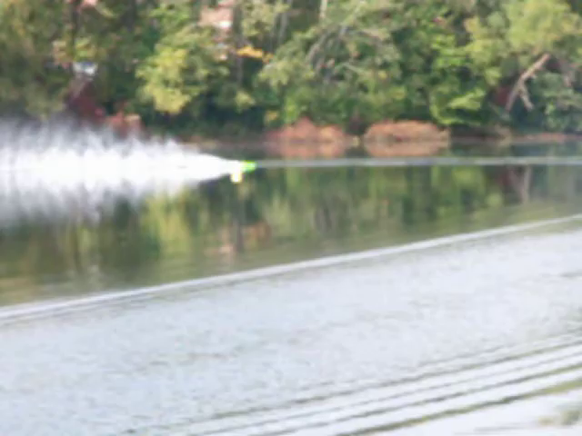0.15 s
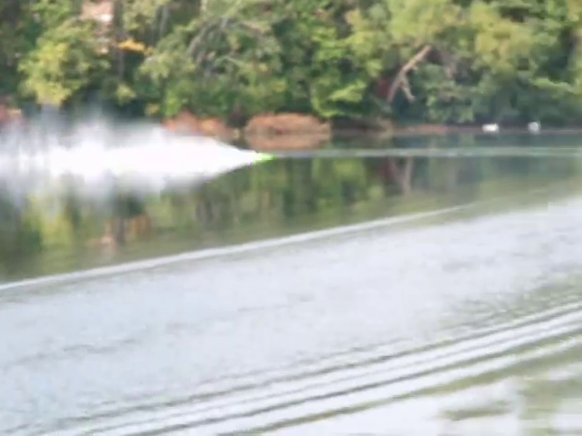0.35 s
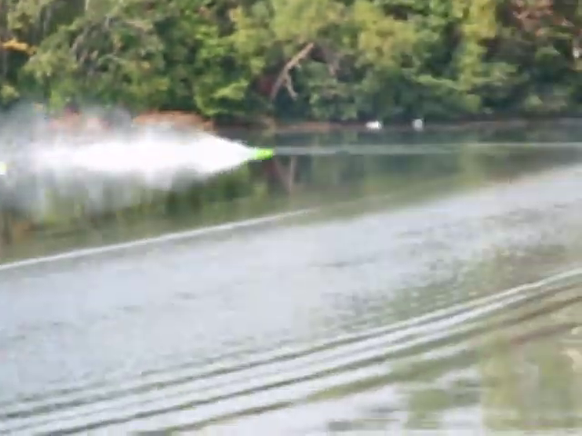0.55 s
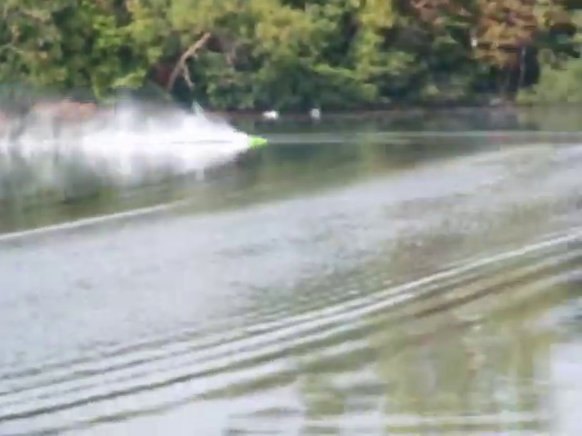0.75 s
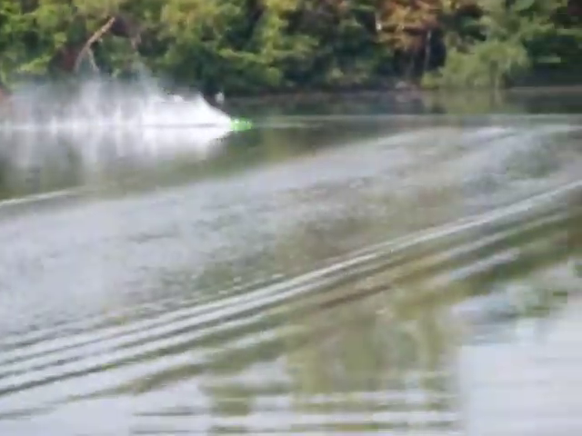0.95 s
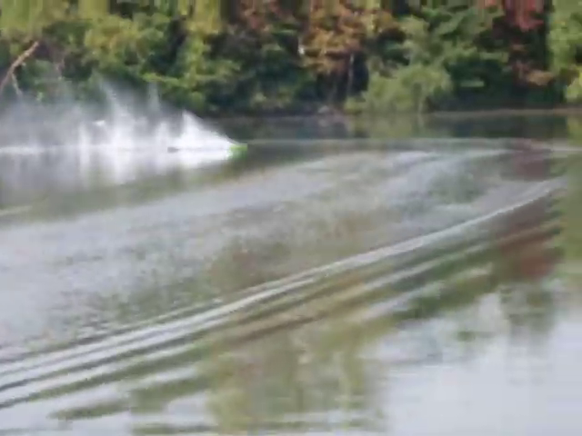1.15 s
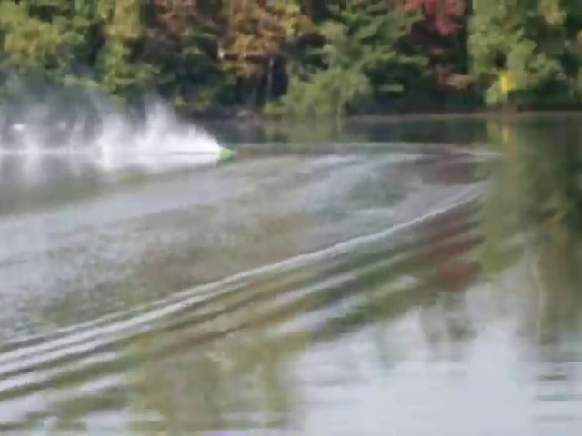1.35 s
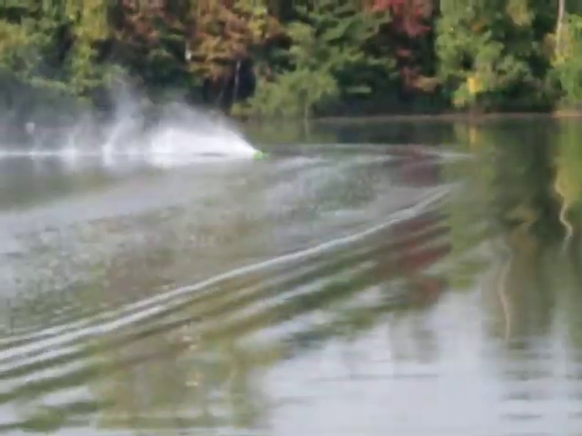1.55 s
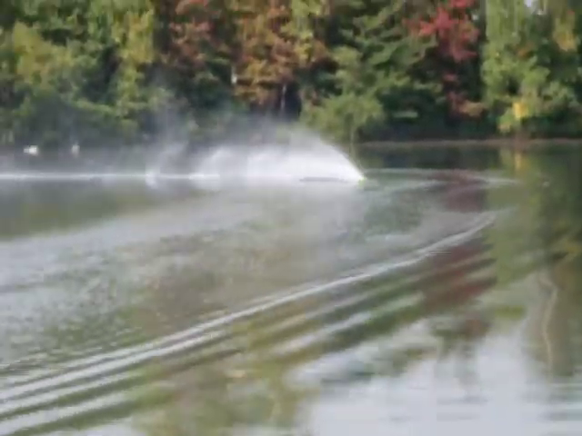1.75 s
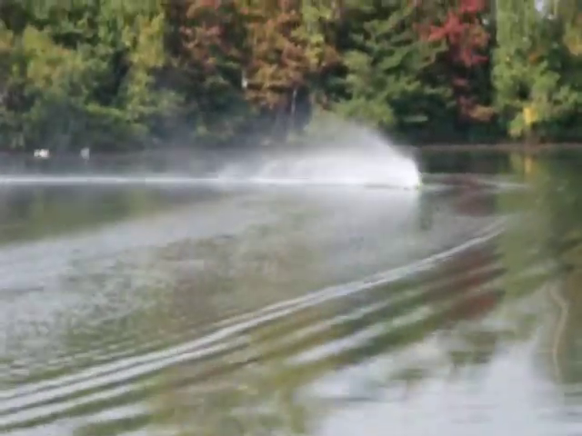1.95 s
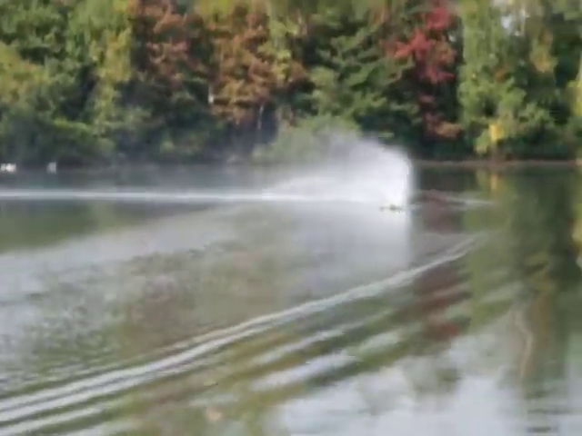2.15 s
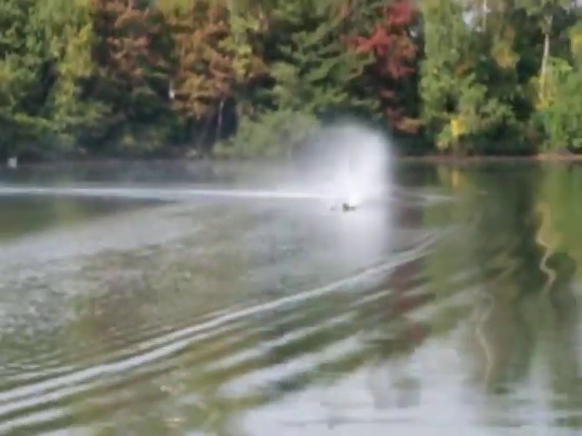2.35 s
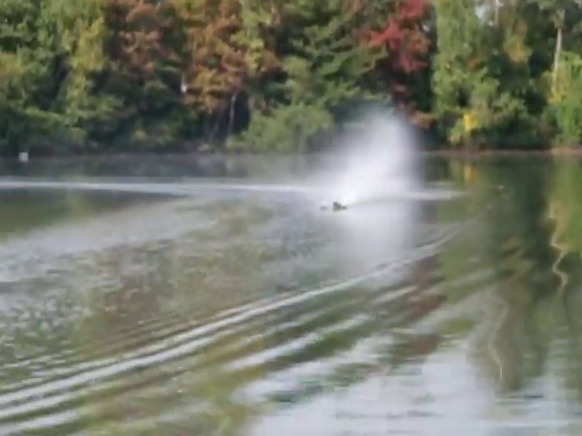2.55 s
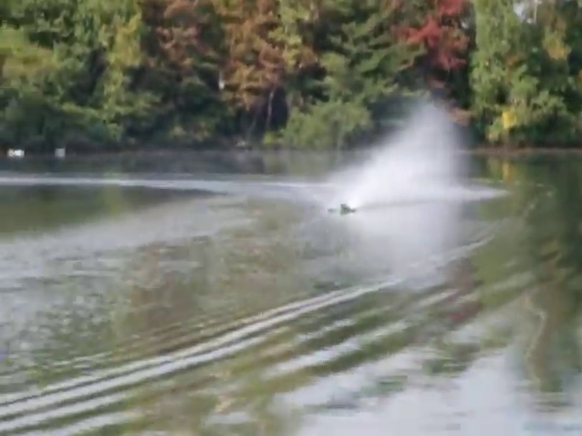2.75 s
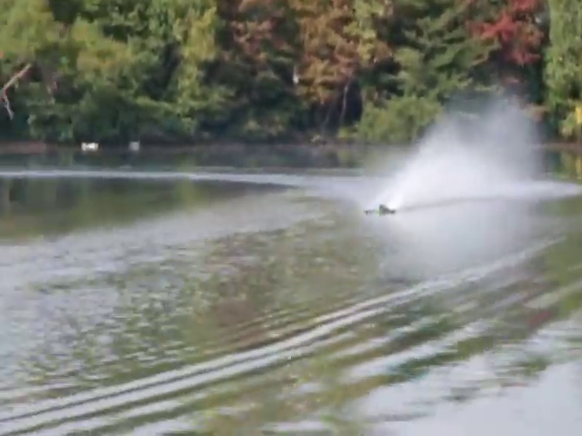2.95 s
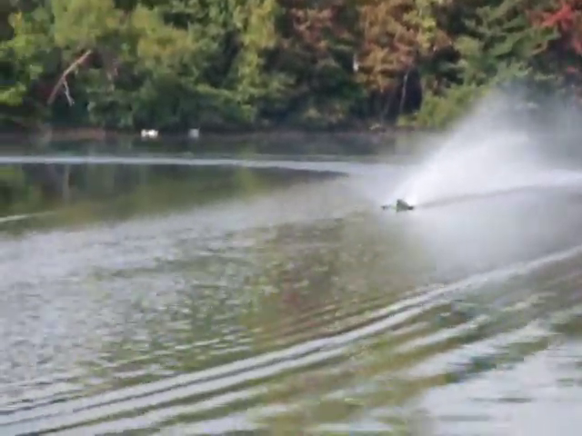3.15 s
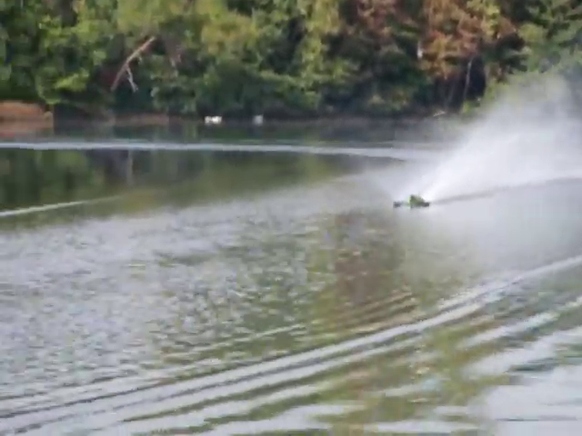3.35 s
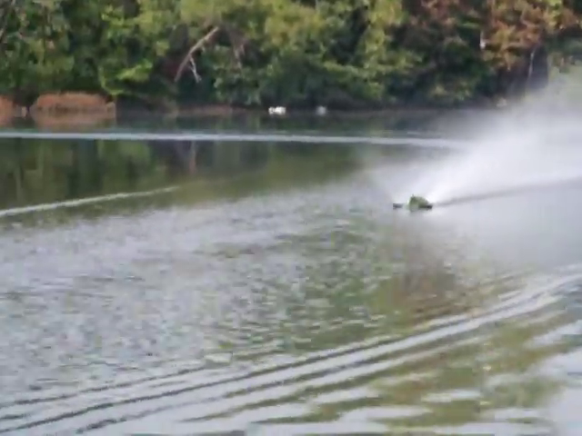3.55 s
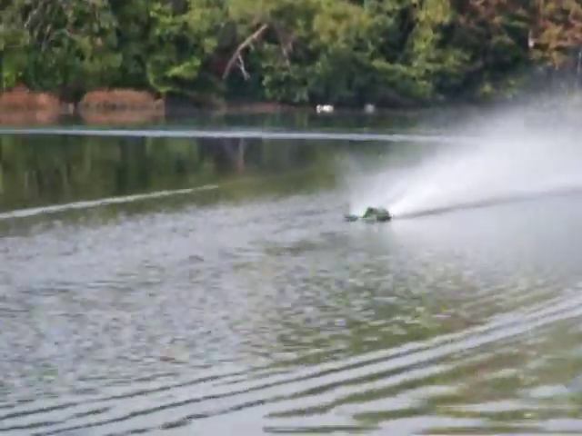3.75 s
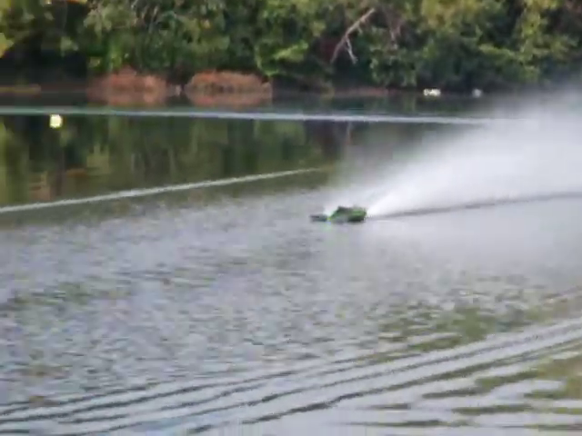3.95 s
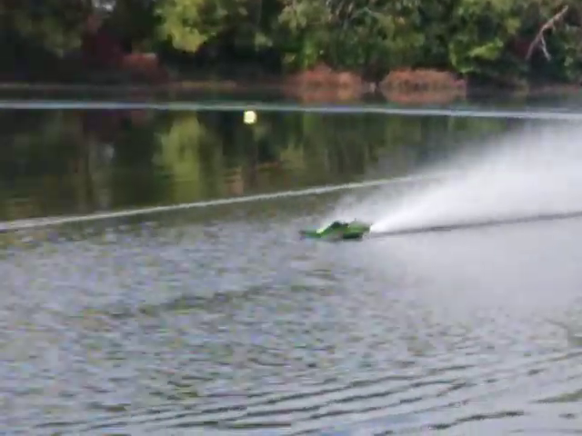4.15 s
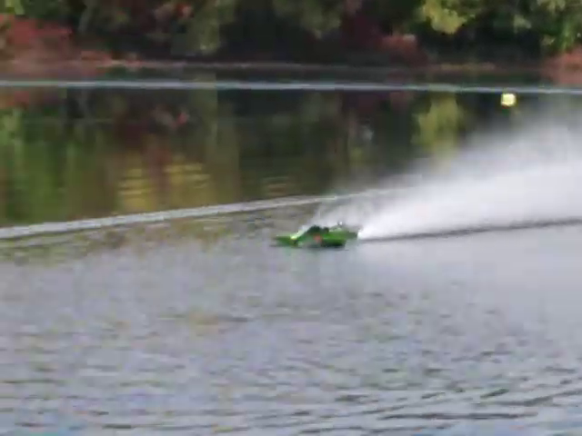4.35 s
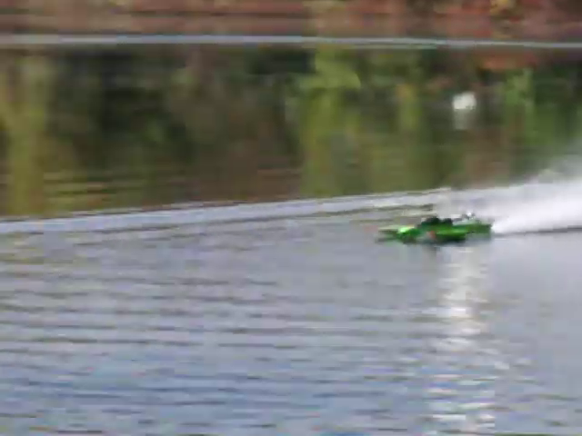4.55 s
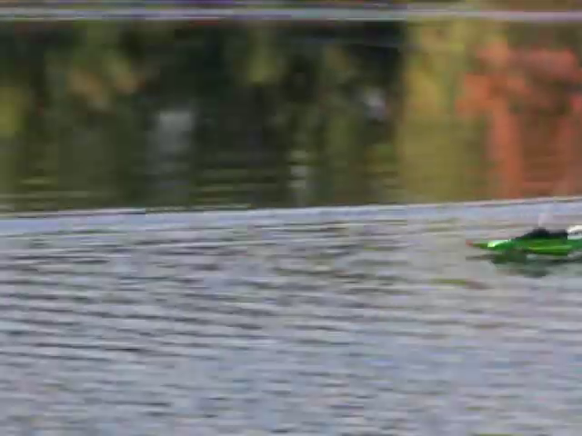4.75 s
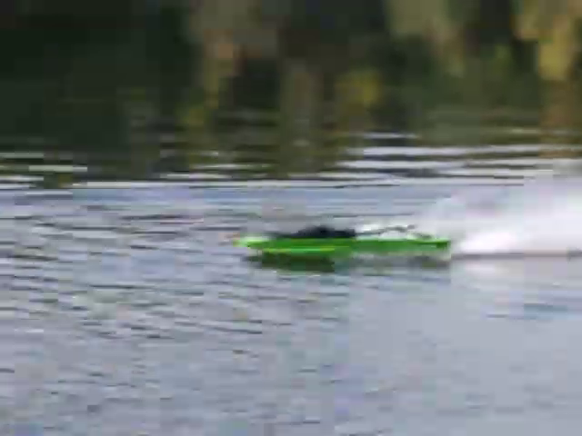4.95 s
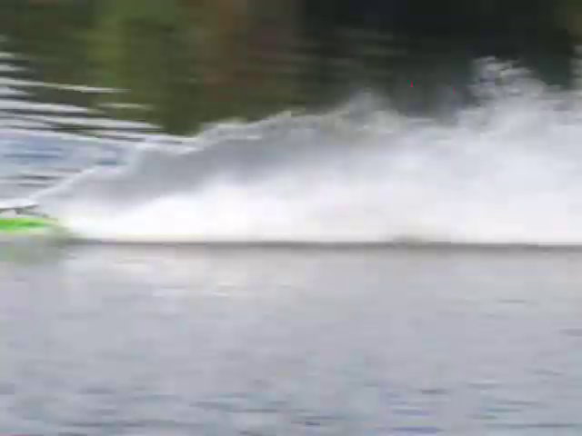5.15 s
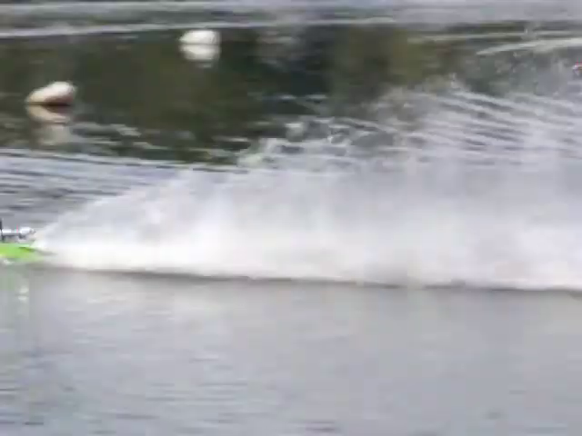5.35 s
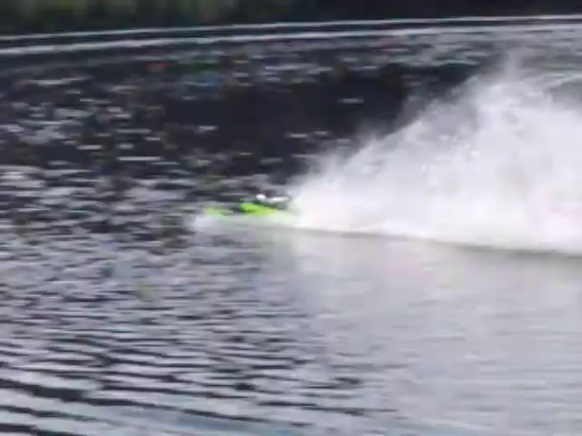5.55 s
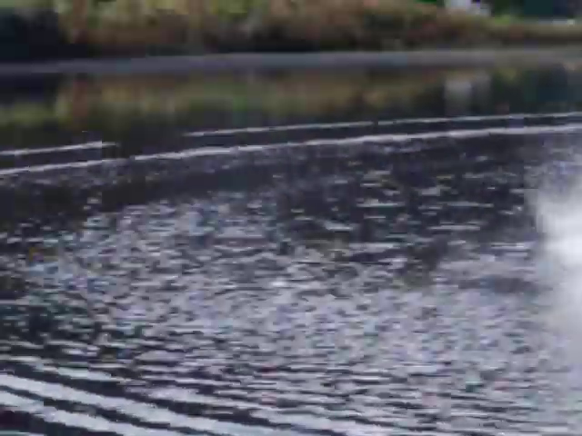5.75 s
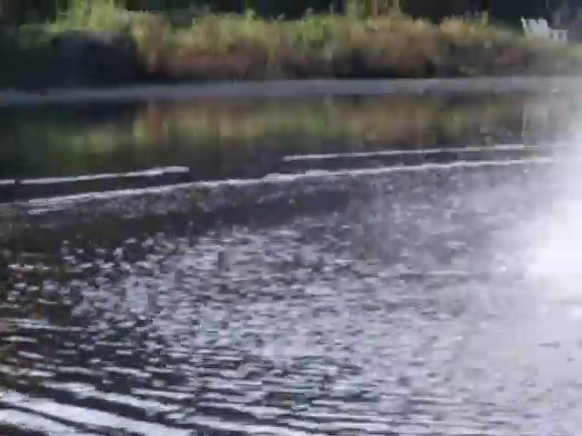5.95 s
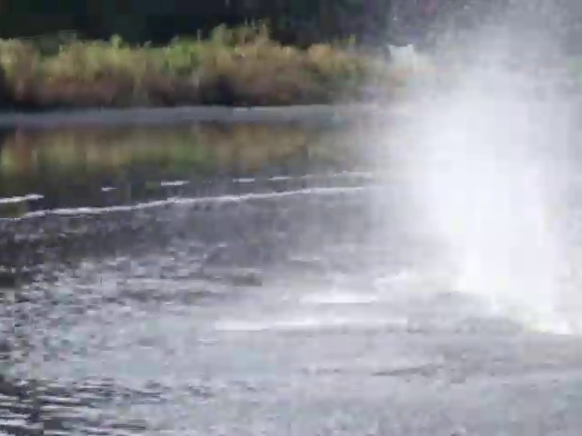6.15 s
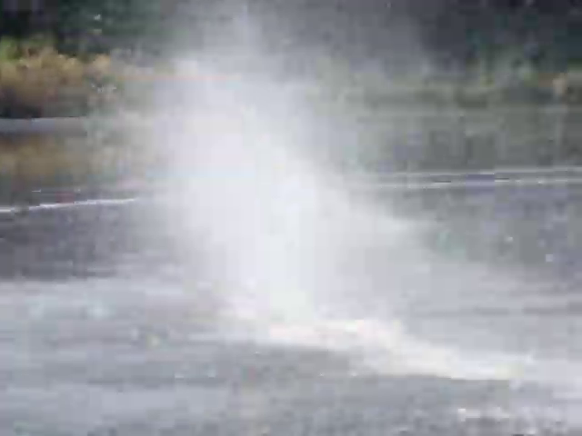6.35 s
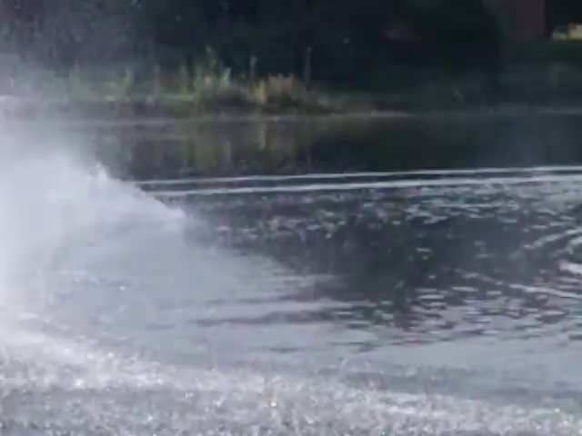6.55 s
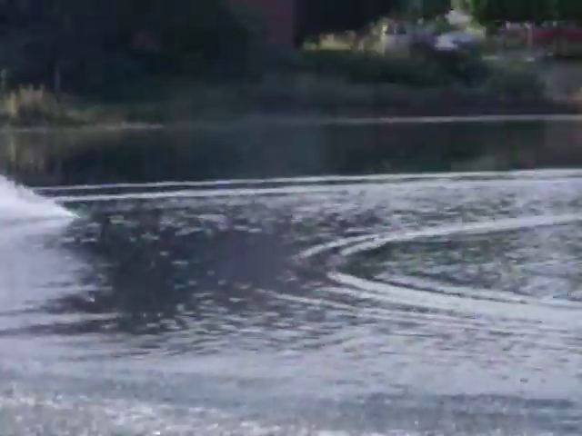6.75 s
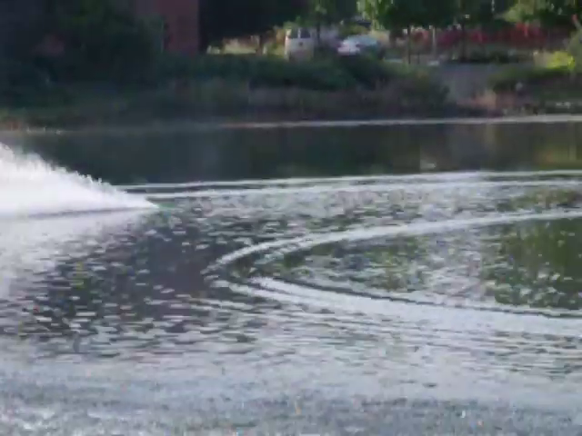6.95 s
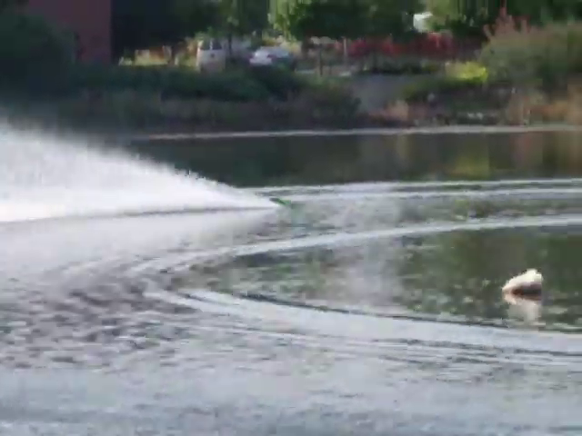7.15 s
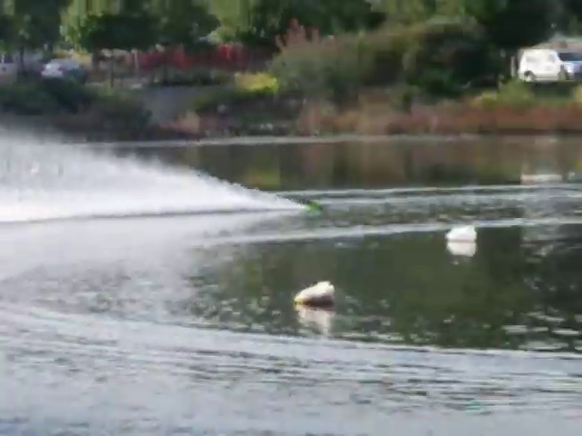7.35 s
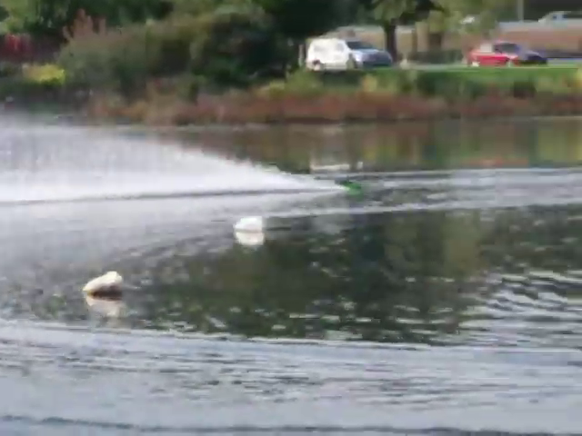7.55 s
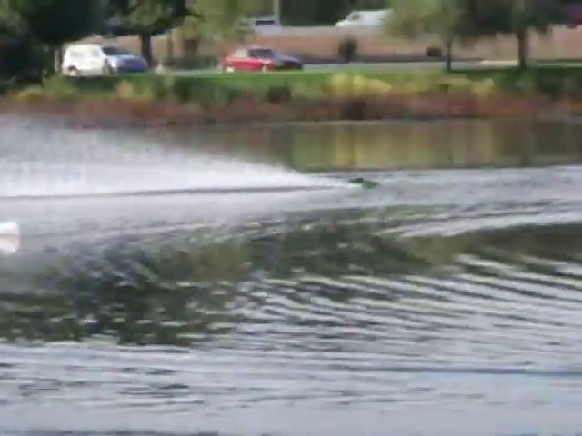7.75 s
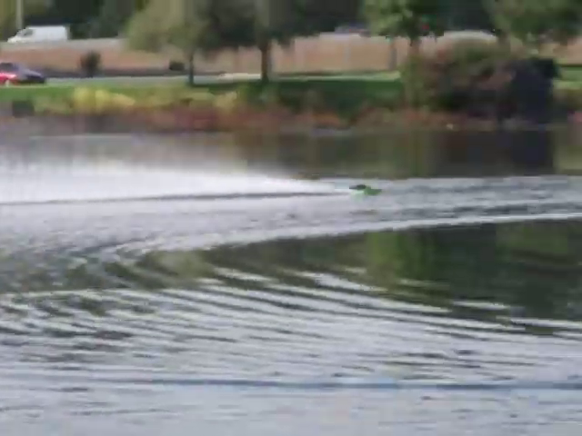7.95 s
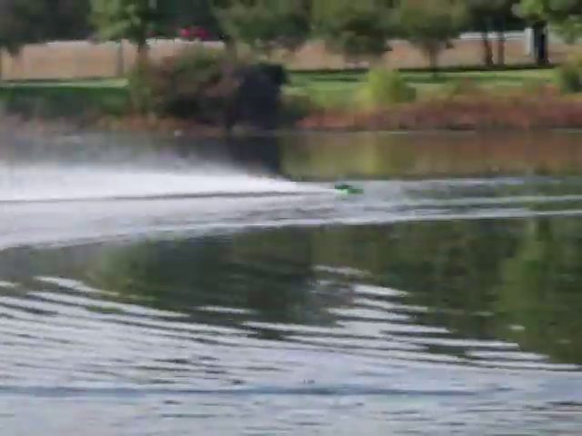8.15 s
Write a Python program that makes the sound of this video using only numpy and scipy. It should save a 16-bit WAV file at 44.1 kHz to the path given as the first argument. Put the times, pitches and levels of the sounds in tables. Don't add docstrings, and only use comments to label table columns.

```python
import sys
import numpy as np
from scipy import signal
from scipy.fft import rfft, irfft, next_fast_len
from scipy.io import wavfile
from scipy.ndimage import uniform_filter1d

SR = 44100
rng = np.random.default_rng(int(sys.argv[2]) if len(sys.argv) > 2 else 0)


def volts_from_decibels(level):
    exponent = np.asarray(level, float) / 20
    return 10 ** exponent


def int16_out(signal):
    q = np.round(np.clip(np.atleast_2d(signal).T, -1, 1) * 32767)
    wavfile.write(sys.argv[1], SR, q.astype(np.int16))


N = 361619

# t/s, nearness/dB, bearing off the bow/degrees,
# extra path off the water for the pipe/ms, for the hull/ms
LAP = [(0.0, -42, -104, 0.45, 0.19), (0.35, -43.5, -109, 0.44, 0.16), (1.25, -37, -79.5, 0.5, 0.17),
       (1.74, -40, -105, 0.502, 0.19), (1.95, -35.0, -78, 0.43, 0.17), (2.83, -31.9, -85.5, 0.35, 0.18),
       (3.28, -28.5, -34.5, 0.332, 0.18), (3.71, -27, -36.5, 0.41, 0.17), (4.32, -29.5, 59, 0.435, 0.2),
       (4.75, -23.5, 92, 0.38, 0.24), (5.0, -17, 100.5, 0.2, 0.25), (5.59, -17, 120, 0.15, 0.21),
       (5.88, -21.5, 145, 0.15, 0.248), (6.09, -29.5, 204, 0.26, 0.2453), (6.64, -28.5, 139.5, 0.27, 0.19),
       (7.05, -32, 133, 0.3, 0.16), (7.37, -28, 143.5, 0.23, 0.21), (8.2, -33, 197.5, 0.1, 0.22)]
PIPE_ORDERS = 4


def rms_one(x):
    return x / np.sqrt(np.mean(x ** 2) + 1e-20)


def in_time(rows):
    s, *columns = np.transpose(rows)
    return [np.interp(np.arange(N) / SR, s, c) for c in columns]


def at_hz(points, hz):
    points_hz, points_db = np.transpose(points)
    return np.interp(np.log(hz), np.log(points_hz), points_db)


def drift(rate):
    r = np.exp(-80 * np.pi * rate / SR)
    slow = signal.lfilter([1], [1, -2 * r, r * r], rng.standard_normal(N // 40 + 2002))[2000:]
    return np.interp(np.arange(N) / 40, np.arange(len(slow)), rms_one(slow))


def coloured(points):
    size = next_fast_len(N)
    hz = np.arange(1, size // 2 + 2) * SR / size
    octaves_outside = np.abs(np.log2(hz / np.clip(hz, points[0][0], points[-1][0])))
    gain = volts_from_decibels(at_hz(points, hz) - 60 * octaves_outside)
    return rms_one(irfft(rfft(rng.standard_normal(size)) * gain, size)[:N])


def resonance(x, hz, width_hz):
    r = np.exp(-np.pi * width_hz / SR)
    zeros = np.array([1, 0, -1]) * (1 - r * r) / 2
    return signal.lfilter(zeros, [1, -2 * r * np.cos(2 * np.pi * hz / SR), r * r], x)


def crank(wobble_hz, skip_wobble_hz):
    # t/s, f/Hz
    cruising = [(0.0, 395.3), (0.61, 413.5), (0.95, 441.6), (1.27, 385), (1.88, 420), (2.21, 431.4),
                (2.9, 418.3), (2.91, 430.5), (3.78, 440.3), (4.94, 424.6), (5.36, 396.9), (5.88, 403.6),
                (5.88, 350.4), (6.42, 354), (6.8, 371), (7.35, 384.2), (7.73, 365), (8.2, 362.6)]
    # t of bite/s, race/%, bog/%, bite length/s
    hull_skips = [(0.323, 3.5, 0.5, 0.083), (0.406, 2, 7.5, 0.039), (0.432, 6, 0.77, 0.003),
                  (0.479, 2.2, 4.5, 0.04693), (0.559, 2.14, 2.0, 0.063), (0.655, 0.45, 4.0, 0.048),
                  (0.79, 16, 17.5, 0.03116), (0.891, 11.5, 18.5, 0.034), (1.009, 9.4, 9.5, 0.025),
                  (1.093, 4.5, 9.5, 0.077), (1.223, 11, -0.5, 0.021), (1.263, 14, 3.5, 0.034),
                  (1.372, 14, 6.5, 0.069), (1.484, 10.5, 4, 0.065), (1.604, 2, 3, 0.097),
                  (1.733, 1.24, 3.5, 0.059), (2.663, 1.22, 0.39, 0.148), (4.594, 1.83, 0.5, 0.043),
                  (4.66, 1.58, -0.5, 0.052), (5.204, 1.3, 3.5, 0.034), (5.295, 5.5, 4.5, 0.042),
                  (5.43, 24, 12.5, 0.039), (5.554, 18.5, 13.5, 0.03), (5.677, 18, 19, 0.05),
                  (5.801, 0.4, 10, 0.031), (5.904, 8.5, 5, 0.052), (6.126, 1.0, 0.9, 0.091),
                  (6.463, 2.22, -1.28, 0.13), (7.415, 0.8, 0.6, 0.068), (7.499, 0.45, -1.64, 0.18)]
    race_rate = 396
    t = np.arange(N) / SR
    skips_percent = np.zeros(N)
    for s, race, bog, bite in hull_skips:
        start = s - abs(race) / race_rate
        end = s + bite + abs(bog) / race_rate
        skips_percent += np.interp(t, [start, s, s + bite, end], [0, race, -bog, 0])
    cruise = uniform_filter1d(in_time(cruising)[0], size=8800, mode="nearest")
    hz = cruise * (1 + skips_percent / 100)
    inertia = np.hanning(1041)
    hz = signal.fftconvolve(np.pad(hz, 520, "edge"), inertia / inertia.sum(), "valid")
    skipping = np.tanh(uniform_filter1d(np.abs(np.gradient(hz)) * SR, size=6000) / 500)
    hz = hz + wobble_hz * drift(24.34) + skip_wobble_hz * skipping * drift(44.92)
    return hz, 2 * np.pi * np.cumsum(hz) / SR, skipping


def radiated(hz):
    # level/dB, louder ahead/dB, to port/dB, along the keel/dB, on the diagonal/dB
    order_lobes = [(13.5, -1.25, 0.18, -0.45, 3), (5, 5, 0.37, -1.5, 2), (2.5, -5, 0.65, 2, 5.5),
                   (1.3, -3.8, -2, -0.5, 3.5), (-14.5, -2.6, -2.5, 0.1, 3), (-10.5, 1.5, 0.6, -2, 1.5),
                   (-8, 7.5, 3, -2, 5), (-4.5, 6, 4, -8.5, 0), (-2.5, 1.8, 2.5, -2.9, 4),
                   (6.5, 2, 5, -3, 3.5), (4, -1.6, 0.5, 3.9, 7.5), (-1.1, -0.2, 0, 9.5, 7)]
    water_mirror = 0.68
    close_db, close_lift = -27, .3
    near_db, bearing, pipe_ms, hull_ms = in_time(LAP)
    bearing = np.radians(bearing)
    mean_hz = uniform_filter1d(hz, size=8000)
    sides = np.array([np.cos(bearing), np.sin(bearing), np.cos(2 * bearing), np.sin(2 * bearing)])
    level = {}
    for order, (db, *lobes_db) in enumerate(order_lobes, 1):
        path_ms = pipe_ms if order <= PIPE_ORDERS else hull_ms
        cycles = order * mean_hz * path_ms / 1000
        mirror = 1 + water_mirror ** 2 - 2 * water_mirror * np.cos(2 * np.pi * cycles)
        level[order] = near_db + db + lobes_db @ sides + 10 * np.log10(mirror + 1e-4)
        if order > PIPE_ORDERS + 2:
            level[order] += close_lift * np.clip(near_db - close_db, 0, None)
    return level


def engine(hz, angle, skipping, flutter_db, flutter_db_per_order):
    # f/Hz, level/dB
    whine_top = [(3800, 2), (4300, -16.5), (4750, -19.5), (5150, -17), (5600, -26.5), (6000, -21.5),
                 (6400, -42.5), (7000, -62)]
    # t/s, heard Hz per Hz aboard
    doppler_ratio = [(0, 0.93), (4.6, 1.47), (5.3, 1.008), (8.2, 1.004)]
    # f/Hz, level/dB
    body_modes = [(340, -23.5), (420, -18.5), (480, -11.5), (680, -36.5), (780, -27), (900, -19.5),
                  (1020, -18), (1110, -11), (1210, -27), (1350, -11.5), (1500, -7), (1650, -15),
                  (1880, -42.5),
                  (2100, -25), (2260, -16), (2400, -21.5), (2580, -43), (2900, -22.5), (3220, -21),
                  (3450, -28), (3900, -13.5), (4180, -28), (4350, -22), (4650, -28.5), (5100, -39),
                  (5800, -27), (6500, -66.5)]
    whine_orders = (8, 9, 10, 11)
    lift_db, lifted_orders = 1.5, (9, 11, 12)
    bite_db, bite_hz_per_s = -1, 1700
    fade_db, fades_per_s = .7, 2.5
    level = radiated(hz)
    for order in range(13, 17):
        level[order] = level[12] + at_hz(whine_top, order * hz) - at_hz(whine_top, 12.0 * hz)
    aboard_hz = hz / in_time(doppler_ratio)[0]
    whine = np.sqrt(sum(volts_from_decibels(level[order]) ** 2 for order in whine_orders) / len(whine_orders))
    falling_hz_per_s = -uniform_filter1d(np.gradient(hz), size=600) * SR
    drag = np.tanh(np.clip(falling_hz_per_s / bite_hz_per_s, 0, None))
    out = 0
    for order, db in level.items():
        swept = volts_from_decibels(at_hz(body_modes, order * aboard_hz))
        gain = volts_from_decibels(db) * swept / np.sqrt(uniform_filter1d(swept ** 2, size=11000))
        if order >= whine_orders[0]:
            share = .65 * skipping
            gain = (1 - share) * gain + share * whine * swept * volts_from_decibels(19.5)
        flutter = (flutter_db + flutter_db_per_order * order) * drift(24.7)
        flutter = flutter + fade_db * drift(fades_per_s)
        flutter = flutter + bite_db * drag * (order <= PIPE_ORDERS) + lift_db * (order in lifted_orders)
        wander = .025 * order * drift(12) + rng.uniform(0, 2 * np.pi)
        out = out + np.sqrt(2) * gain * volts_from_decibels(flutter) * np.sin(order * angle + wander)
    return out


def banks(x):
    # delay/s, level/dB
    reflections = [(.023, -18), (.041, -18), (.067, -19), (.104, -20)]
    thin = signal.sosfilt(signal.butter(2, 1500, "high", fs=SR, output="sos"), x)
    return sum(volts_from_decibels(db) * np.pad(thin, (round(s * SR), 0))[:N] for s, db in reflections)


def spray(angle, gate, patchy_db):
    # t/s, level/dB
    tail_level = [(0, -27.5), (.8, -26), (1.6, -27.5), (2.6, -27.5), (3.4, -24.5), (4.2, -22.5),
                  (4.65, -17.5), (5.2, -13), (5.6, -15), (6.0, -19.5), (6.4, -23.5), (7.4, -23.5),
                  (8.2, -25.5)]
    # f/Hz, level/dB per Hz
    rush_colour = [(250, -9), (450, 2), (650, -1.5), (1000, 6), (1400, 2), (1750, -6.5), (2000, -43)]
    middle_colour = [(1600, 7), (2000, -4.5), (2500, -2), (3000, -3.5), (3400, -16)]
    hiss_colour = [(2700, -16), (3300, -5), (3900, -4), (4400, -9.5), (4800, -12.5), (5300, -12),
                   (5900, -18), (6400, -43)]
    puff = 1 + gate * np.cos(angle)
    db = in_time(tail_level)[0]
    ahead = np.cos(np.radians(in_time(LAP)[1]))
    shared = patchy_db * drift(6.6)
    rush = volts_from_decibels(db - 3.0 + shared) * coloured(rush_colour)
    above_far_db = db + 29
    middle_db = -41 + 1.56 * above_far_db + 2.5 * ahead
    hiss_db = -34 + 1.3 * above_far_db - .5 * ahead
    middle = volts_from_decibels(middle_db + shared) * coloured(middle_colour)
    hiss = volts_from_decibels(hiss_db + shared) * coloured(hiss_colour)
    return rush + (middle + hiss) * puff


def background():
    # f/Hz, level/dB per Hz
    traffic_colour = [(20, -14), (50, -2.5), (120, -1), (250, 1.5), (450, -2), (900, -1.5)]
    # t/s, level/dB
    hull_wash = [(0, -71.5), (4.2, -76.5), (4.7, -39), (5.3, -31), (5.7, -38), (5.95, -71), (8.2, -62.5)]
    machine_hz = [74.6, 135.7]
    out = volts_from_decibels(-36.5) * coloured(traffic_colour)
    wash_db = in_time(hull_wash)[0] + 3.3 * drift(12)
    out = out + volts_from_decibels(wash_db) * coloured([(20, -2.0), (120, -0.5), (400, -23.0)])
    swell_db = np.interp(np.arange(N) / SR, [5.84, 5.84 + 0.34], [0, 7])
    for hz, db, sway_db in zip(machine_hz, [-46 + swell_db, -47], [-0.9, 1.5]):
        phase = 2 * np.pi * np.cumsum(hz + .8 * drift(0.84)) / SR
        out = out + np.sqrt(2) * volts_from_decibels(db + sway_db * drift(.8)) * np.sin(phase)
    return out + volts_from_decibels(-54) * rms_one(resonance(rng.standard_normal(N), 5530, 30))


def taps():
    # t/s, peak level/dB
    knocks = [
        (.053, -16),
        (.088, -16.5),
        (.13, -16.5),
        (7.1, -23),
        (7.15, -24),
    ]
    burst = np.zeros(N)
    for s, db in knocks:
        i = round(s * SR)
        burst[i:i + 500] = volts_from_decibels(db) * rng.standard_normal(500) * np.hanning(500) ** 2
    high = resonance(resonance(burst, 2400, 500), 2400, 500)
    low = resonance(resonance(burst, 1850, 300), 1850, 300)
    return np.roll(3 * high + 4 * low, -250)


def honks():
    # t/s, length/s, start f/Hz, end f/Hz, level/dB
    bird_calls = [
        (3.201, 0.12, 690, 717, -26),
        (4.573, 0.082, 558, 635, -24),
    ]
    out = np.zeros(N)
    for s, length, start_hz, end_hz, db in bird_calls:
        n = round(length * SR)
        i = round(s * SR)
        phase = 2 * np.pi * np.cumsum(np.linspace(start_hz, end_hz, n)) / SR
        voice = np.sin(phase) + 0.31 * np.sin(2 * phase)
        out[i:i + n] = volts_from_decibels(db) * np.hanning(n) ** .5 * voice
    return out


def scene():
    hz, angle, skipping = crank(wobble_hz=.4, skip_wobble_hz=1.2)
    tones = engine(hz, angle, skipping, flutter_db=.5 + skipping, flutter_db_per_order=.05 + .05 * skipping)
    tail = volts_from_decibels(-0.5 * skipping) * spray(angle, gate=.15, patchy_db=.35)
    boat = tones + banks(tones) + tail
    return (boat + background() + taps() + honks())[None]


def top_cut(x):
    return signal.sosfilt(signal.butter(12, 16460, fs=SR, output="sos"), x)


def record(dry):
    input_clip, output_clip = 0.76, .715
    overloaded = np.clip(volts_from_decibels(1.0) * dry, -input_clip, input_clip)
    narrow = signal.sosfiltfilt(signal.cheby2(7, 40, 7050, fs=SR, output="sos"), overloaded)
    clipped = np.clip(narrow, -output_clip, output_clip)
    clipped = signal.sosfiltfilt(signal.cheby2(12, 40, 16050, fs=SR, output="sos"), clipped)
    return top_cut(clipped - .003)


dry = scene()
out = record(dry)
int16_out(out)
```